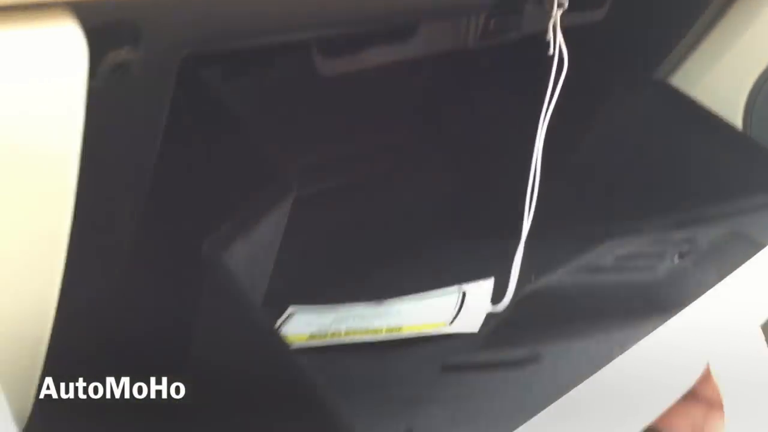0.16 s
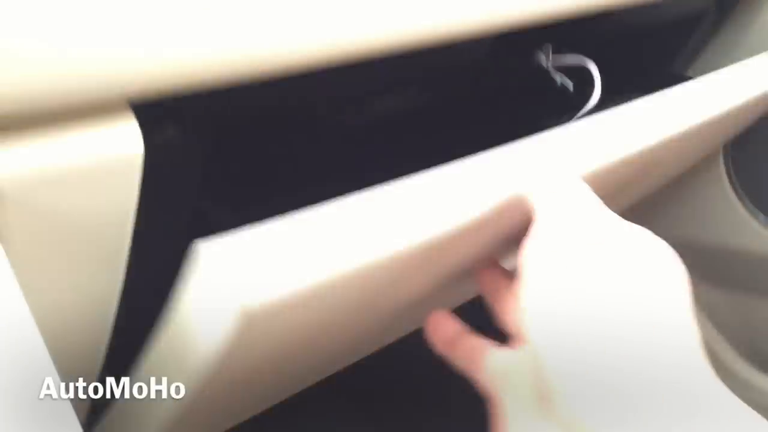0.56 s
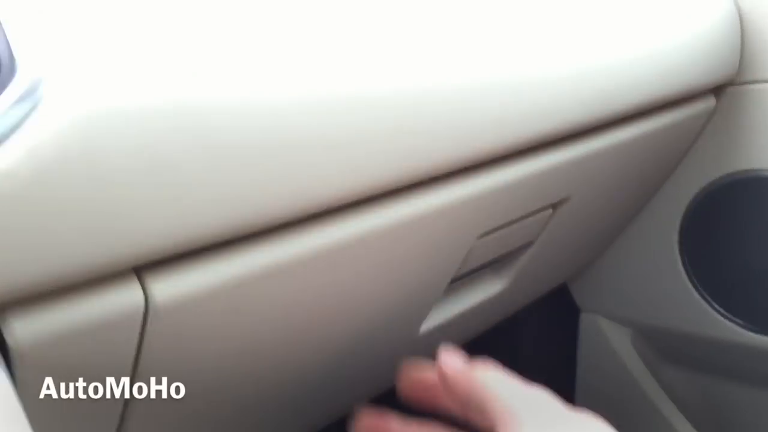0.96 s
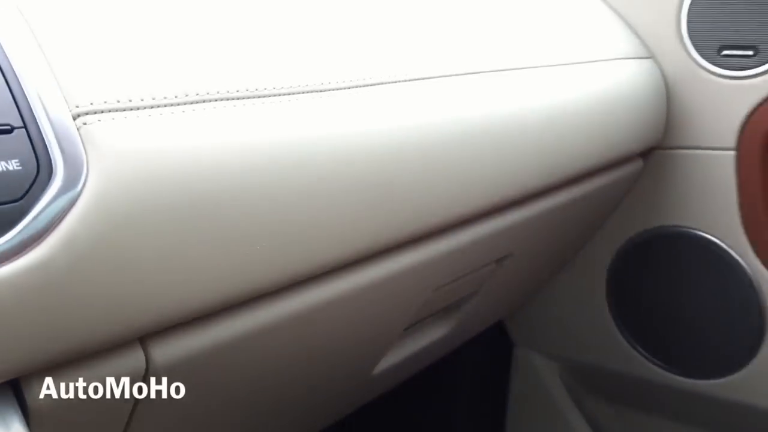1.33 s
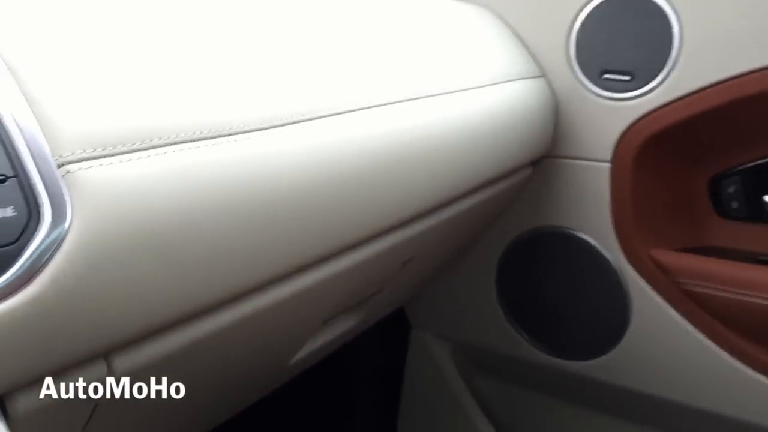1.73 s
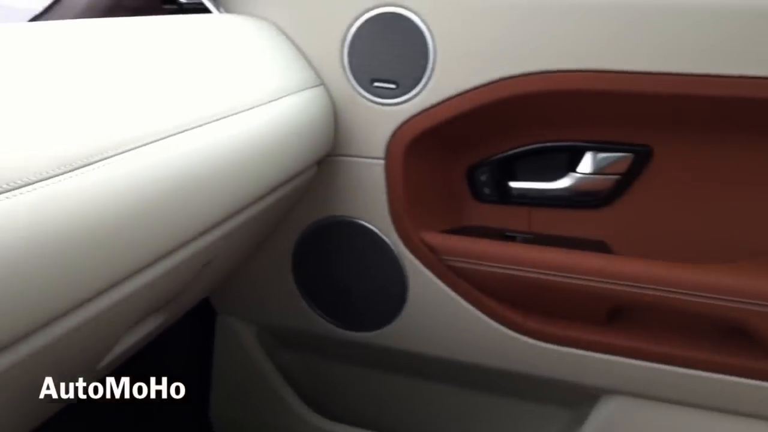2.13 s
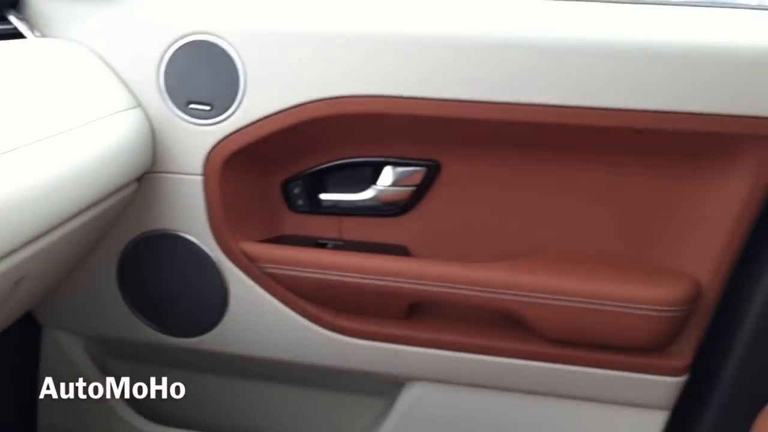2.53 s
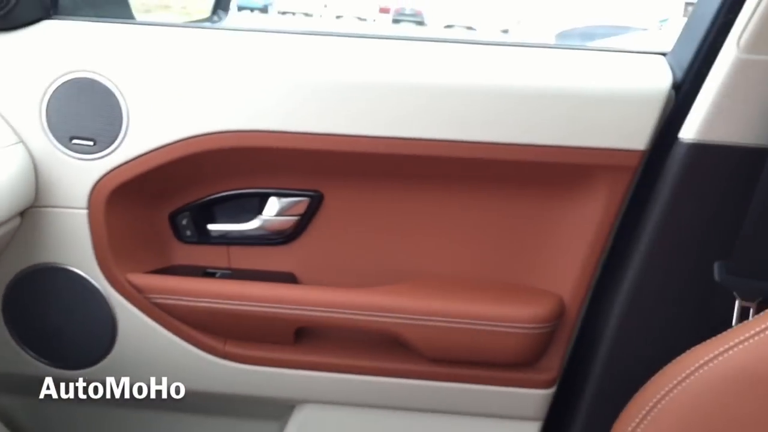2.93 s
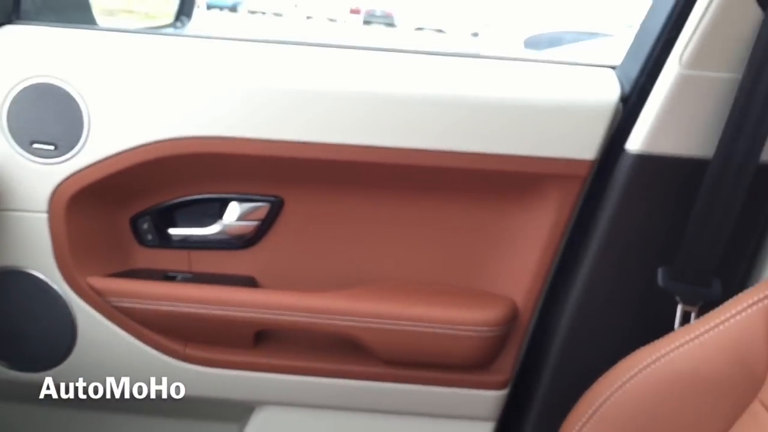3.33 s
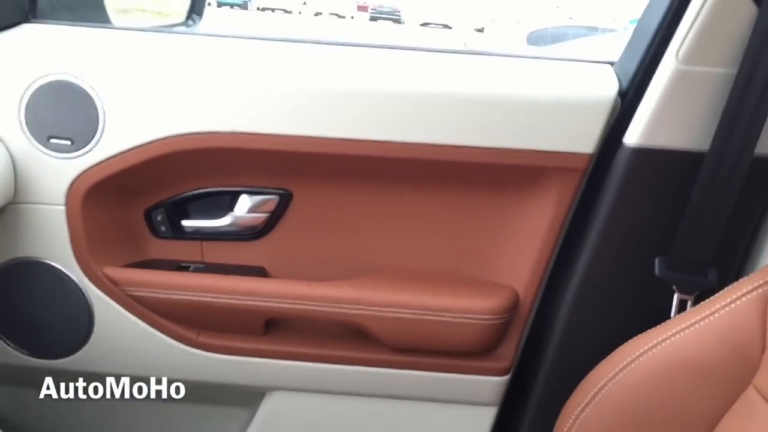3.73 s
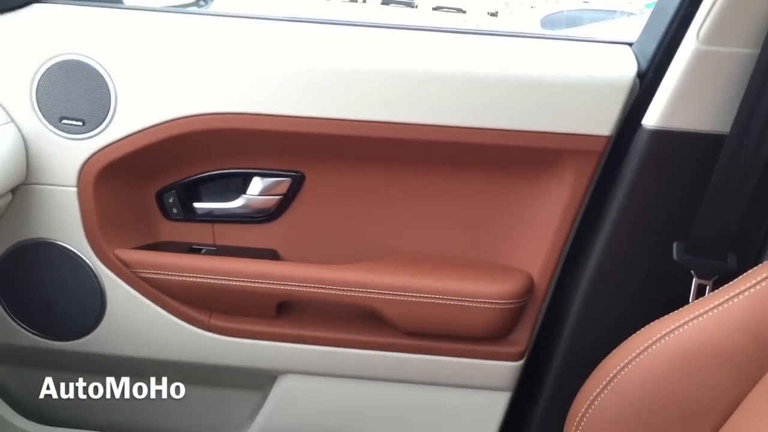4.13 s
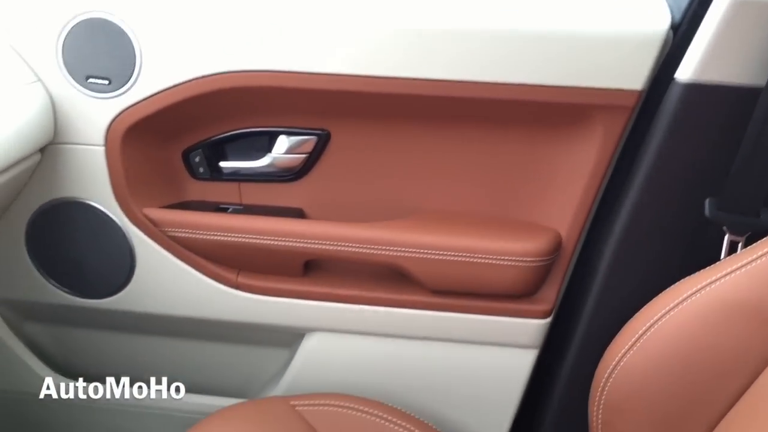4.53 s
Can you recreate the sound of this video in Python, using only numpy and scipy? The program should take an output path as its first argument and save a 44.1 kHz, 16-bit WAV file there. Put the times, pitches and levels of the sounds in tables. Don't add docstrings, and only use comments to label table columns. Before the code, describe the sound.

Inside an idling car, a compartment lid swings shut with a loud double clack and dull thump, followed by soft sleeve rustle and tiny ticks.

```python
import sys
import numpy as np
from scipy import signal
from scipy.fft import rfft, irfft, next_fast_len
from scipy.io import wavfile
from scipy.ndimage import uniform_filter1d

SR = 44100
rng = np.random.default_rng(int(sys.argv[2]) if len(sys.argv) > 2 else 0)


def natural_amplitude(level_db):
    exponent = np.asarray(level_db, float) / 20
    return 10 ** exponent


def generate_wav(sig):
    pcm = np.round(np.clip(np.atleast_2d(sig).T, -1, 1) * 32767).astype(np.int16)
    wavfile.write(sys.argv[1], SR, pcm)


N = 206091


def evened(x):
    return x / np.sqrt(np.mean(x ** 2) + 1e-20)


def read(points, hz):
    f, value = np.transpose(points)
    return np.interp(np.log(hz + 1), np.log(f + 1), value)


def add(mix, start_s, sound):
    part = mix[round(start_s * SR):][:len(sound)]
    part += sound[:len(part)]


def coloured(x, spectrum):
    size = next_fast_len(len(x), True)
    gain = natural_amplitude(read(spectrum, np.fft.rfftfreq(size, 1 / SR)))
    return irfft(rfft(x, size) * gain, size)[:len(x)]


def resonate(x, hz, width_hz):
    turn = np.exp(2j * np.pi * hz * np.arange(len(x)) / SR)
    r = np.exp(-np.pi * width_hz / SR)
    return 2 * (turn * signal.lfilter([1 - r], [1, -r], x / turn)).real


def smoothed(x, size):
    return uniform_filter1d(uniform_filter1d(x, size), size)


def slow(span_s):
    return evened(smoothed(rng.standard_normal(N), max(int(span_s * SR), 2)))


def patchy(x, depth_db, frames, bins):
    z = signal.stft(x, nperseg=512)[2]
    field = uniform_filter1d(rng.standard_normal(z.shape), bins, 0)
    field = evened(uniform_filter1d(field, frames, 1))
    return evened(signal.istft(z * natural_amplitude(depth_db * field), nperseg=512)[1][:N])


# pitch_hz, level_db (rms), waver_width_hz, noise_share (0-1)
ENGINE_ORDERS = [(41.04, -56, 16, 1), (52.14, -40.5, 3, 0.08), (78, -65, 5.6, .6), (101.3, -59.5, 5.7, 0.6),
                 (181.6, -61, 6.7, 0.8), (198.35, -61.5, 5.4, 0.97), (220.7, -60, 2.9, 0.9),
                 (390, -61.5, 21, 0.96), (445.5, -64.5, 12, 1), (561.7, -66.5, 40, 0.89),
                 (1133, -73.5, 130, 0.98)]


def hum():
    t, out = np.arange(N) / SR, np.zeros(N)
    for hz, db, width, share in ENGINE_ORDERS:
        fuzzy = resonate(rng.standard_normal(N), hz, width)
        fuzzy = evened(resonate(fuzzy, hz, width))
        steady = np.sqrt(2) * np.sin(2 * np.pi * (hz * t + rng.random()) + 0.4 * slow(0.15))
        out += natural_amplitude(db) * (np.sqrt(1 - share) * steady + np.sqrt(share) * fuzzy)
    return out


# centre_s, length_s, level_db (rms)
BOOM_SWELLS = [(0.033, 0.1, -44), (0.29, .16, -44), (0.616, 0.27, -46.5), (0.853, 0.13, -39),
               (1.163, 0.34, -42.5), (1.378, 0.29, -43), (1.68, 0.17, -43.5), (1.883, 0.31, -40.5),
               (2.247, 0.29, -43.5), (2.55, .14, -47.5), (2.731, .14, -41), (2.9, .26, -41.5),
               (3.09, 0.23, -39), (3.44, .16, -39.5), (3.63, .2, -40), (3.796, .1, -38), (4.07, .28, -41.5),
               (4.4, .3, -40.5), (4.66, .1, -44.5)]


def boom():
    boom_hz, drift_hz, shake_hz, rest_db = 125.3, 2.2, 3.1, -59.5
    t = np.arange(N) / SR
    level = np.full(N, natural_amplitude(rest_db))
    for centre_s, length_s, db in BOOM_SWELLS:
        u = np.clip((t - centre_s) / (1.15 * length_s), -.5, .5)
        level += natural_amplitude(db) * np.cos(np.pi * u)
    turns = np.cumsum(boom_hz + drift_hz * slow(.08) + shake_hz * slow(0.0082)) / SR
    return level * natural_amplitude(-2.0 + 1.6 * slow(0.022)) * np.sqrt(2) * np.sin(2 * np.pi * turns)


# pitch_hz, level_db (per Hz)
AIR_COLOUR = [(38, -30), (64, 2), (97, -5), (140, -6), (313, -19.5), (394, -24), (544, -20.5), (751, -30),
              (1140, -32), (1500, -40), (3350, -41.5), (4960, -49), (13300, -53), (15700, -61)]


def air():
    return natural_amplitude(-44.5 + 0.28 * slow(0.45)) * evened(coloured(rng.standard_normal(N), AIR_COLOUR))


def micro_slips():
    burst = np.minimum(rng.exponential(1, N // 40 + 1), 3).repeat(40)[:N]
    return rng.standard_normal(N) * natural_amplitude(0.68 * burst)


# start_s, length_s, end_level_db, fineness_db (per layer, coarse to fine), growth_db
HAND_STROKES = [(0, 0.03, -75, 2, -3), (0.349, 0.14, -60, -4.5, 12), (0.49, .16, -60.5, -1.5, 1.5),
                (0.654, 0.065, -49.5, -0.5, 6.5), (.745, .055, -67, -2.5, -16),
                (0.847, 0.057, -67.5, 11, -2), (0.97, 0.093, -65, -11, 2.5), (0.949, 0.21, -55, -2, 12),
                (1.147, .2, -55.5, -2.5, 2), (1.342, .175, -57.5, -4, -4.5), (1.775, .02, -69, 0, -3),
                (1.852, 0.052, -65, 1, -2.5), (1.901, 0.078, -69, 3, 0.5), (2.409, 0.024, -73, 1, 2),
                (2.503, .02, -77, 2.5, 1.5), (2.56, .045, -72, -5.5, 2), (2.73, .025, -74, -2, 0),
                (3.025, 0.065, -73.5, 5, 3), (3.095, .05, -69.5, 4.5, 1.5), (3.595, .008, -71, -0.5, 0),
                (3.715, .025, -74, -1, 0), (4.001, .008, -71, 0, -1), (4.41, .03, -75, -0.5, -3)]


def stroke_gains():
    settle_s, rise_s, tau_s = .85, 1, 1.71
    settle_db, loss_db, settle_fine_db = -55.5, 30, -4
    still_db = np.array([[-68], [-79.5], [-81.5]])
    grip_s, release_s, quick_share = .015, .014, .3
    t, step = np.arange(N) / SR, np.array([[-1], [0], [1]])
    since = np.maximum(t - settle_s, 0)
    rest_db = settle_db - loss_db * (1 - np.exp(-since / tau_s)) + step * settle_fine_db
    power = np.minimum(since / rise_s, 1) * natural_amplitude(rest_db) ** 2
    power += (t < settle_s) * natural_amplitude(still_db) ** 2
    for start, length, db, fine_db, growth_db in HAND_STROKES:
        u = np.arange(round((length + 6 * release_s) * SR)) / SR
        grip, release = np.minimum([grip_s, release_s], quick_share * length)
        hold = np.minimum(u / grip, 1) * np.exp(-np.maximum(u - length, 0) / release)
        growth = growth_db * np.minimum(u / length - 1, 0)
        for row, k in zip(power, step):
            add(row, start, (hold * natural_amplitude(db + k * fine_db + growth)) ** 2)
    return np.sqrt(power)


# pitch_hz, level_db (per Hz)
SCRAPE_COLOUR = [(130, -34.5), (220, 0), (404, -4.5), (471, -9), (549, -8), (605, -12), (1680, -20.5),
                 (2200, -29), (2860, -54.5), (4840, -120)]
# pitch_hz, width_hz, level_db
HINGE_RINGS = [(1115, 64, -10.5), (1344, 81, -13), (1637, 100, -8.5), (3300, 150, -15.5)]
# time_s, effort_db
LID_EFFORT = [
    (0, -58.5),
    (.12, -56.5),
    (.17, -53),
    (.245, -60),
    (.27, -52.5),
    (.42, -50.5),
    (.55, -50),
    (.69, -53),
    (.86, -68),
]


def lid_swing(slips, coarse):
    scrape = coloured(rng.standard_normal(N), SCRAPE_COLOUR)
    scrape = patchy(scrape, depth_db=2.03, frames=5, bins=4)
    hinge = sum(natural_amplitude(db) * evened(resonate(slips, hz, width)) for hz, width, db in HINGE_RINGS)
    hinge = patchy(hinge, depth_db=3.5, frames=9, bins=3)
    trim = evened(resonate(slips, *HINGE_RINGS[0][:2]))
    swing = natural_amplitude(np.interp(np.arange(N) / SR, *np.transpose(LID_EFFORT)))
    low = np.sqrt(swing ** 2 + (natural_amplitude(-6) * coarse) ** 2) + natural_amplitude(-63.5 + 0.74 * slow(.06))
    awake = np.minimum(swing / natural_amplitude(-52.5), 1)
    return low * scrape + natural_amplitude(-7) * swing * awake * hinge + natural_amplitude(-11) * coarse * trim


# pitch_hz, level_db (per Hz)
DRAG_COLOUR = [(760, -32), (1300, -3), (1420, -9.5), (1620, -4.5), (2390, -1), (2770, -2), (4300, -7),
               (5590, -36.5), (9460, -120)]
# pitch_hz, width_hz, level_db
LEATHER_RINGS = [(1640, 490, -5.5), (2000, 480, -7), (2430, 75, 1), (3054, 150, -4), (5440, 210, -7.5)]
# pitch_hz, level_db (per Hz)
WEAVE_COLOUR = [(2530, -29.5), (4300, -1.5), (4970, -3), (5450, -5), (6210, 0.5), (8500, -5.5),
                (11000, -37.5), (18700, -120)]
# pitch_hz, level_db (per Hz)
FABRIC_COLOUR = [(5000, -33.5), (8500, -3.5), (10600, -3), (13000, -2), (14500, -3), (15700, -12.5)]


def rubbing(slips, gains):
    rings = evened(sum(natural_amplitude(db) * resonate(slips, hz, width) for hz, width, db in LEATHER_RINGS[:-1]))
    drag = evened(coloured(slips, DRAG_COLOUR)) + 1.1 * rings
    drag = patchy(drag, depth_db=3.5, frames=7, bins=3)
    weave = evened(coloured(slips, WEAVE_COLOUR))
    weave += .35 * evened(resonate(slips, *LEATHER_RINGS[-1][:2]))
    weave = patchy(weave, depth_db=2.03, frames=5, bins=4)
    fine = coloured(rng.standard_normal(N) * natural_amplitude(1.3 * slow(.003)), FABRIC_COLOUR)
    fine = patchy(fine, depth_db=2.03, frames=5, bins=4)
    return gains[0] * drag + gains[1] * weave + gains[2] * fine


# start_s, peak_db, pitch_hz, t60_s
TRIM_TICKS = [(.186, -50, 2100, .03), (.217, -47, 1750, .035), (.9882, -37, 1870, .035),
              (1.1515, -42, 2390, .03), (1.2575, -43, 1650, .04), (1.504, -41, 2300, .04),
              (1.781, -49, 2080, .03), (2.2395, -52, 4200, .03), (2.8378, -49, 1833, .02),
              (2.982, -48, 2100, .025), (3.597, -54, 3100, .025), (3.7344, -53, 3700, .03),
              (3.8345, -52, 3120, .03), (4.003, -54, 2900, .025), (4.3734, -55, 1604, .025),
              (4.4294, -54, 3300, .025), (4.577, -51, 4300, .022), (2.13, -50, 2150, .04)]


def ticks():
    snap_colour = [(1100, -30), (1800, 0), (3300, -3), (4800, -20), (15000, -27)]  # Hz, dB
    out, t = np.zeros(N), np.arange(2048) / SR
    for start, db, hz, t60 in TRIM_TICKS:
        snap = evened(coloured(rng.standard_normal(len(t)), snap_colour))
        shape = natural_amplitude(db - 60 * t / t60) * np.minimum(t / .001, 1)
        add(out, start, shape * (.5 * np.sin(2 * np.pi * hz * t) + 0.49 * snap))
    return out


# pitch_hz, t60_s
CABIN_DECAY = [(200, 0.38), (500, 0.17), (1500, 0.08), (4000, 0.064), (8000, 0.064), (15000, 0.05)]


def cabin(x):
    hz, t, z = signal.stft(rng.standard_normal(SR // 2), SR, nperseg=128)
    fade = natural_amplitude(-60 * t / read(CABIN_DECAY, hz)[:, None])
    tail = signal.istft(z * fade, SR, nperseg=128)[1]
    return signal.fftconvolve(x, tail / np.linalg.norm(tail))[:N]


# start_s, peak_db, brightness_db (above 7 kHz), ring_factor, struck_hz (part hit hardest)
LID_BLOWS = [(0.699, -29, -7, 1.4, 3000), (0.7018, 1, -8.5, 0.65, 5000), (.7032, 1.5, -13.5, 0.39, 3300),
             (.7042, -2, -18.5, 0.56, 1350), (0.706, -5, -19, 0.57, 3300), (0.7094, -9, -19.5, .9, 1050),
             (0.7113, -9, -17.5, 0.48, 2211), (0.7137, -12, -16.5, 0.6, 1100), (0.7167, 0.5, 3, .6, 6000),
             (0.7183, 2, 4.5, .7, 3300), (0.7209, -4.5, 3, .5, 8000), (0.7231, -7.5, 1.5, .7, 6000),
             (0.728, -8, -1, .9, 3500), (0.733, -4.5, -8, 0.46, 2000), (0.7375, -19, -1, .9, 2000),
             (.7425, -21, 2, .9, 4200)]
# pitch_hz, level_db, t60_s
LID_MODES = [(268, -10, 0.044), (356, -7, 0.11), (410, -6, .07), (574, -5.5, .06), (942, -4, .045),
             (1147, -5.5, 0.028), (1290, 1, 0.024), (1623, -3.5, 0.033), (2080, -3, .03),
             (2580, -9.5, 0.015), (2950, 0.5, 0.011), (3300, -2.5, 0.036), (3670, -4, 0.018),
             (4110, -7.5, 0.015), (4635, -7.5, 0.055), (5050, -8.5, .02), (6090, 2, .016),
             (7630, -8.5, 0.013), (7880, -6, 0.025)]
# pitch_hz, level_db (per Hz)
CRACK_COLOUR = [(120, -30.5), (200, -1), (800, -5), (1330, 1.5), (2480, -7.5), (3510, 0), (3840, -10),
                (6180, -7), (7150, -7), (14600, -11.5), (15700, -18.5)]


def knock():
    out, t = np.zeros(N), np.arange(4096) / SR
    hz, mode_db, t60 = np.transpose(LID_MODES)[:, :, None]
    for start, db, bright_db, ring, struck_hz in LID_BLOWS:
        sign = np.sign(rng.standard_normal((len(LID_MODES), 1)))
        mix = sign * natural_amplitude(-7 * abs(np.log2(hz / struck_hz)))
        modes = (mix * natural_amplitude(mode_db - 60 * t / (ring * t60)) * np.sin(2 * np.pi * hz * t)).sum(0)
        noise = coloured(rng.standard_normal(len(t)), CRACK_COLOUR)
        noise = coloured(noise, [(5500, 0.00025), (8500, bright_db)])
        crack = evened(noise) * natural_amplitude(-60 * t / (0.048 * ring))
        attack = np.minimum(t / 0.00036, 1)
        add(out, start, natural_amplitude(db) * (0.79 * modes / abs(modes).max() + 0.37 * crack) * attack)
    return out + natural_amplitude(-9.0) * cabin(out)


# start_s, peak_db, pitch_hz, t60_s, first_swing (+1 or -1)
DASH_THUMPS = [
    (.700, -24, 240, .08, 1),
    (.7165, -16, 460, .05, 1),
    (.7225, -10, 88, .12, -1),
    (.742, -18, 120, .1, -1),
    (.745, -20, 46, .35, 1),
    (.783, -25, 41, .35, 1),
    (.77, -30, 205, .2, 1),
    (.757, -16, 95, .08, -1),
    (.988, -26, 47, .3, -1),
]


def thumps():
    out, t = np.zeros(N), np.arange(SR // 2) / SR
    for start, db, hz, t60, sign in DASH_THUMPS:
        attack = np.minimum(t * hz * 4, 1)
        add(out, start, sign * natural_amplitude(db - 60 * t / t60) * np.sin(2 * np.pi * hz * t) * attack)
    return out


# start_s, length_s, pitch_hz (at the turn), level_db (rms), bend_hz (by the end)
LEATHER_GROANS = [
    (1.5, 0.066, 1095, -61, 10),
    (2.19, .14, 1110, -64, 28.5),
    (2.581, 0.0505, 1201, -59, -50),
]
# start_s, length_s, pitch_hz (at the turn), level_db (rms), bend_hz (by the end)
LEATHER_SQUEAKS = [
    (1.51, 0.09, 5390, -62.5, 190),
    (1.605, .045, 5620, -77, 100),
    (1.644, 0.093, 4340, -63, -250),
    (2.052, 0.071, 4240, -64, -110),
]


def squeak(start, length, hz, db, bend_hz, jitter):
    t = np.arange(0, length, 1 / SR)
    turn = .5 if bend_hz > 0 else 0.23
    wobble, flutter = rng.standard_normal((2, 8192))
    wobble = evened(uniform_filter1d(wobble, 150))[:len(t)]
    flutter = evened(smoothed(flutter, 300))[:len(t)]
    glide = abs((t / length - turn) / (1 - turn)) ** 2.7
    pitch = (hz + bend_hz * glide) * (1 + jitter * wobble)
    tone = np.sqrt(2) * np.sin(2 * np.pi * np.cumsum(pitch) / SR)
    return start, natural_amplitude(db + 2.3 * flutter) * tone * signal.windows.tukey(len(t), .35)


def scene():
    slips, gains = micro_slips(), stroke_gains()
    mix = hum() + boom() + air()
    mix += lid_swing(slips, gains[0]) + rubbing(slips, gains)
    mix += ticks() + knock() + thumps()
    for row in LEATHER_GROANS:
        add(mix, *squeak(*row, jitter=0.026))
    for row in LEATHER_SQUEAKS:
        add(mix, *squeak(*row, jitter=.005))
    return mix[None]


def top_cut(x):
    return signal.sosfilt(signal.butter(12, 15820, fs=SR, output="sos"), x)


def record(dry):
    power_db = 10 * np.log10(abs(uniform_filter1d(dry[0] ** 2, 400)) + 1e-12)
    fall = np.arange(N) * 60. / SR
    held_db = np.maximum.accumulate(power_db + fall) - fall
    over_db = np.maximum(held_db + 13.0, 0)
    late_db = np.roll(uniform_filter1d(over_db, 1500), 1500)
    clipped = np.clip(dry / natural_amplitude(.05 * late_db), -1, 1)
    edge = signal.firwin(401, 15900, window=("kaiser", 9), fs=SR)
    return top_cut(signal.oaconvolve(clipped, edge[None], "same"))


dry = scene()
out = record(dry)
generate_wav(out)
```